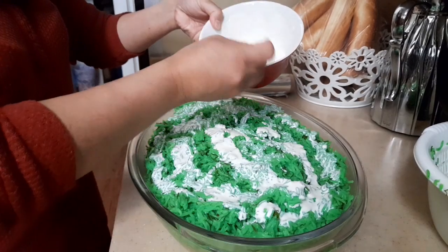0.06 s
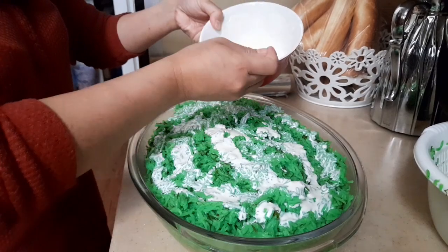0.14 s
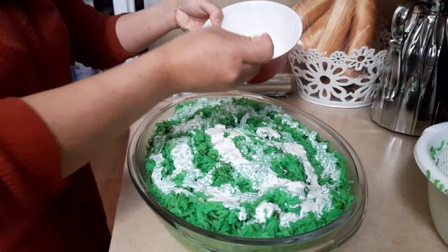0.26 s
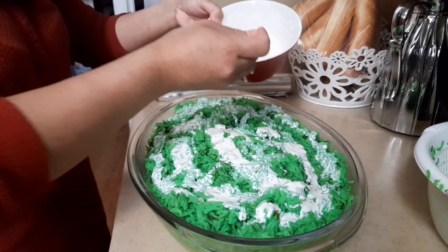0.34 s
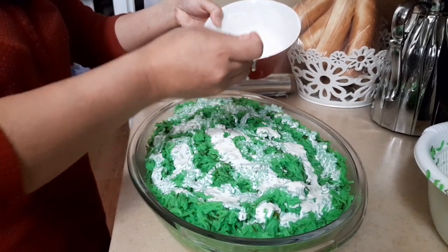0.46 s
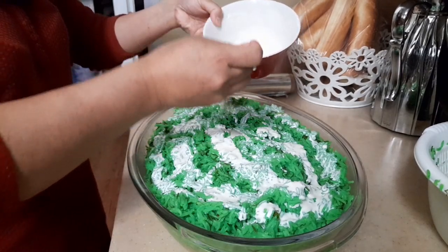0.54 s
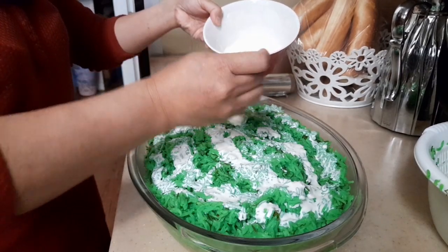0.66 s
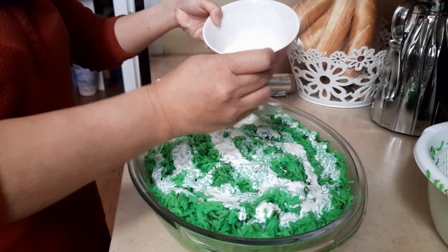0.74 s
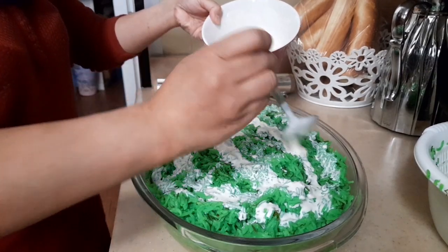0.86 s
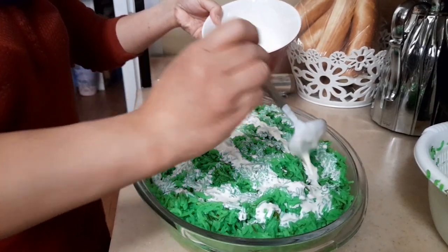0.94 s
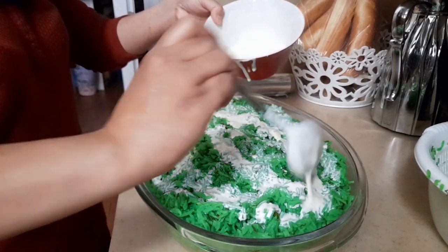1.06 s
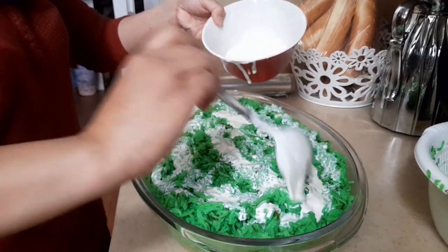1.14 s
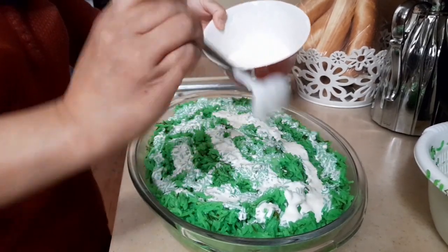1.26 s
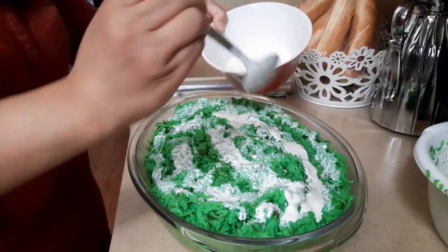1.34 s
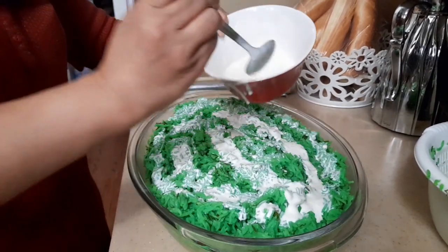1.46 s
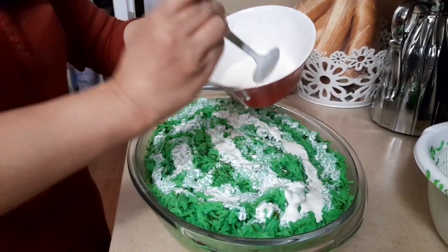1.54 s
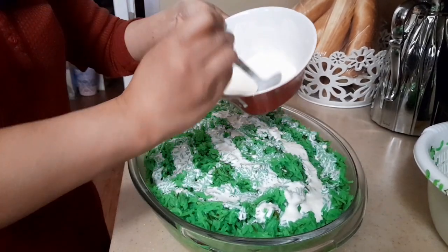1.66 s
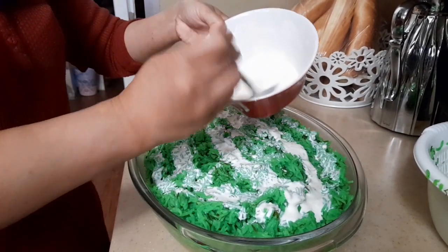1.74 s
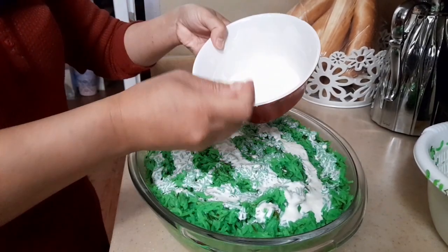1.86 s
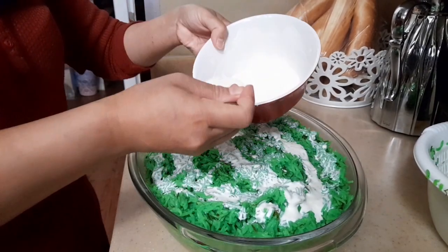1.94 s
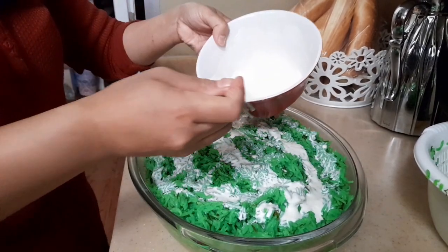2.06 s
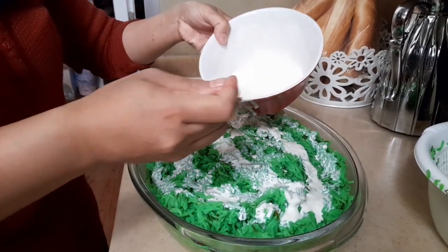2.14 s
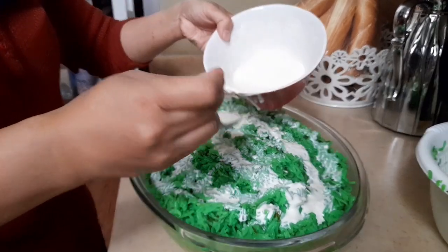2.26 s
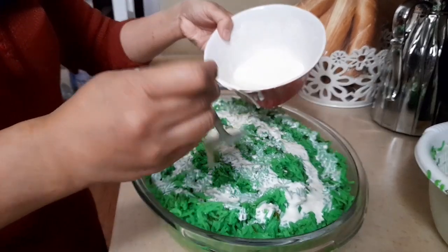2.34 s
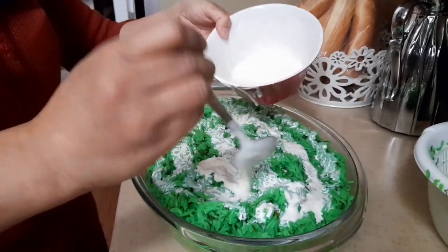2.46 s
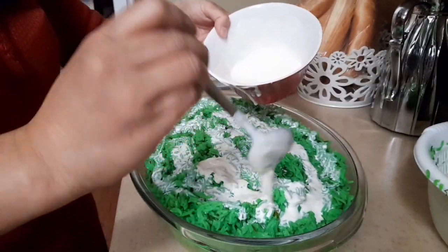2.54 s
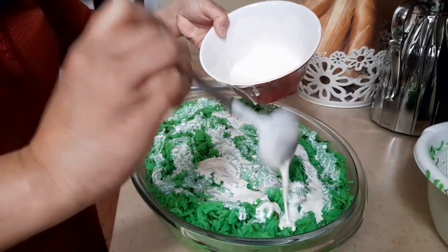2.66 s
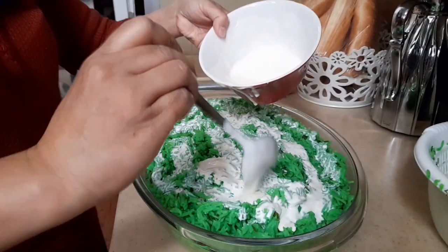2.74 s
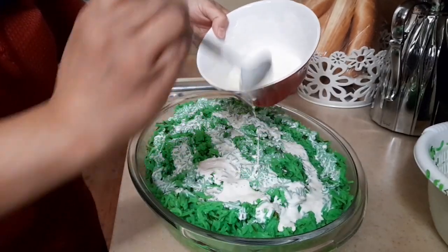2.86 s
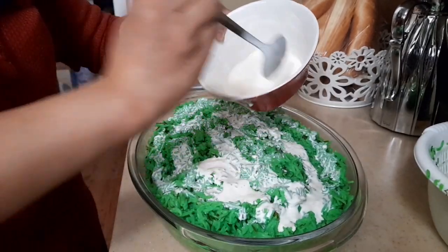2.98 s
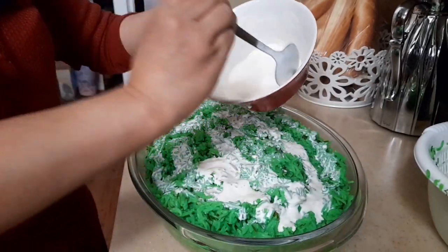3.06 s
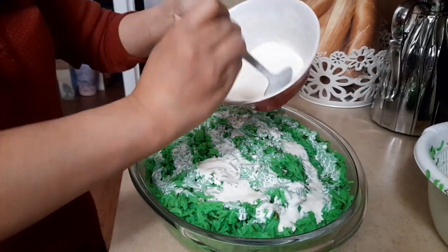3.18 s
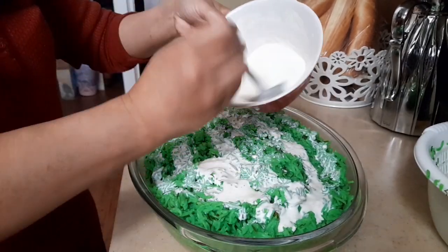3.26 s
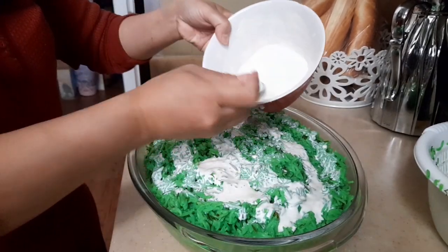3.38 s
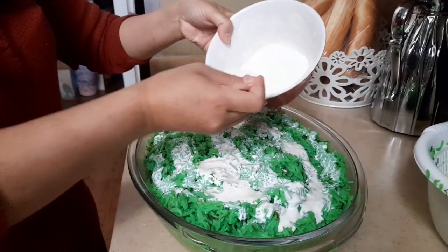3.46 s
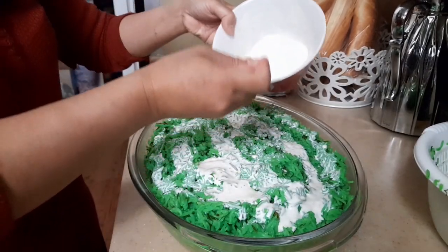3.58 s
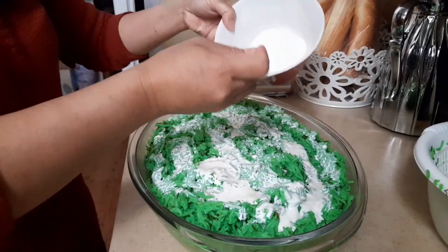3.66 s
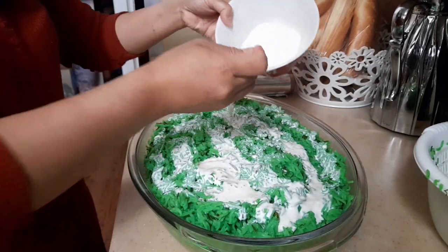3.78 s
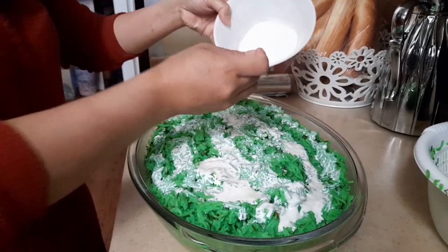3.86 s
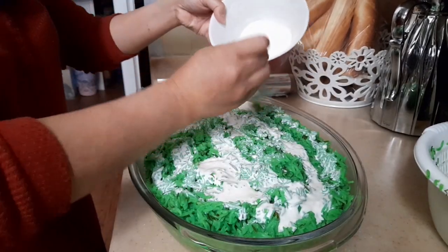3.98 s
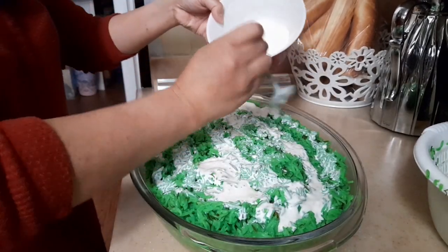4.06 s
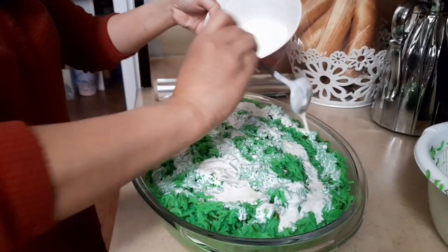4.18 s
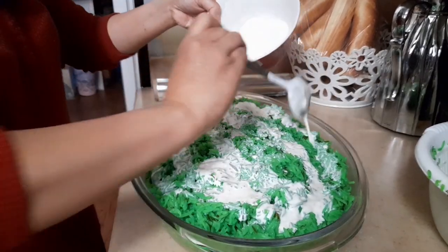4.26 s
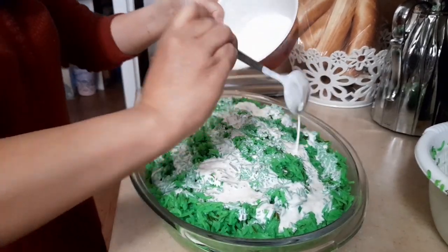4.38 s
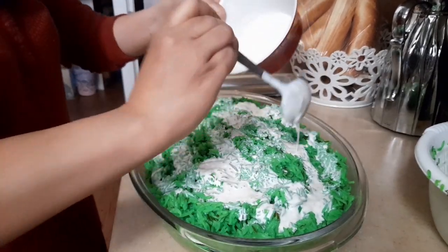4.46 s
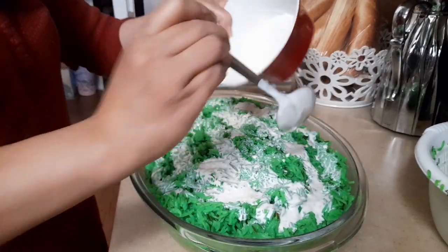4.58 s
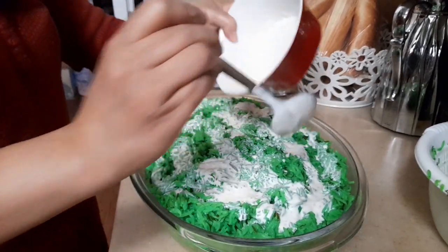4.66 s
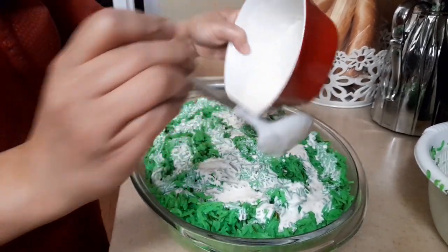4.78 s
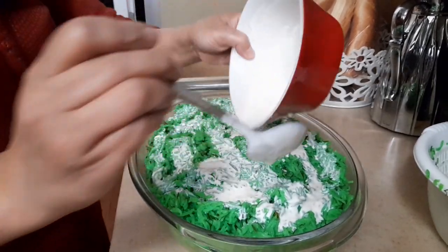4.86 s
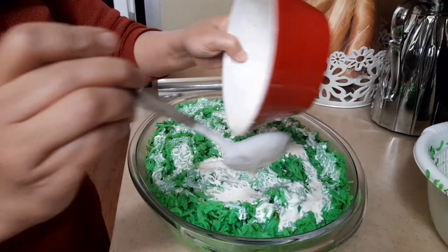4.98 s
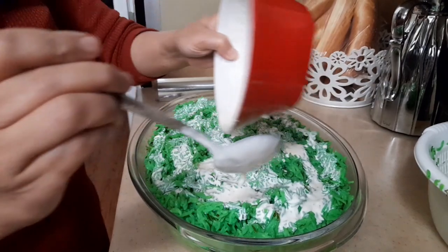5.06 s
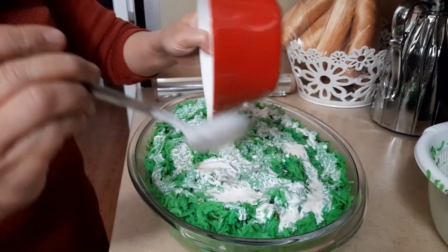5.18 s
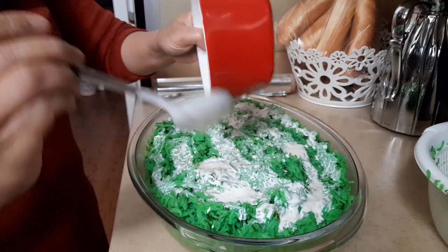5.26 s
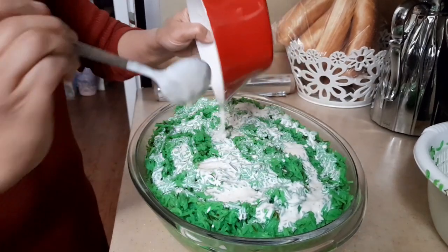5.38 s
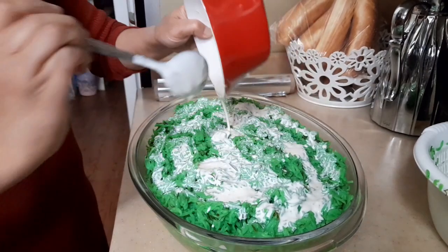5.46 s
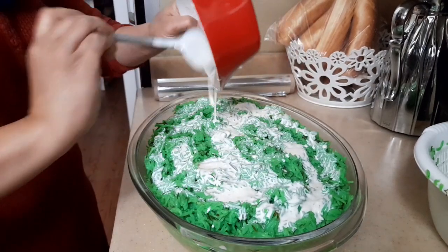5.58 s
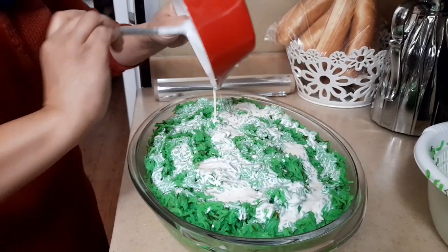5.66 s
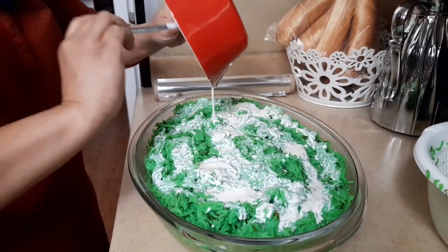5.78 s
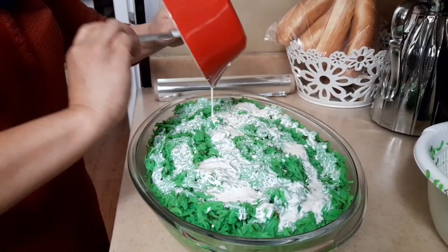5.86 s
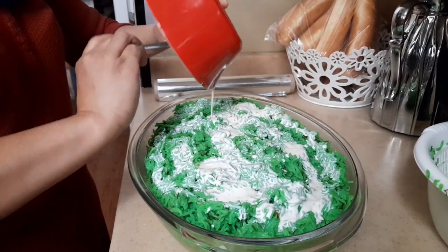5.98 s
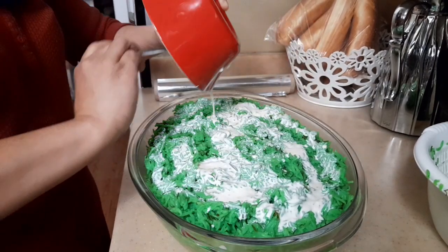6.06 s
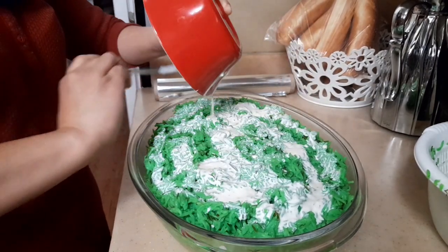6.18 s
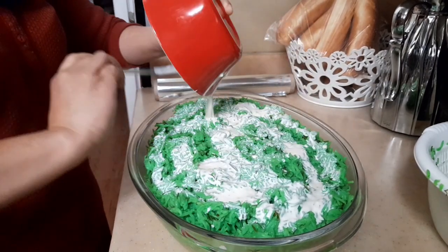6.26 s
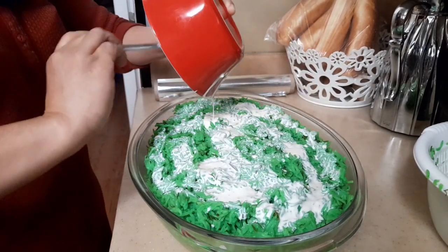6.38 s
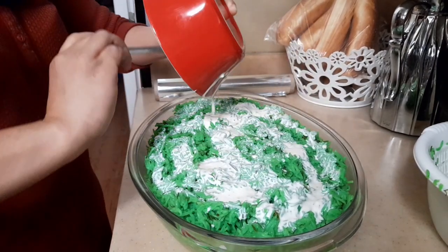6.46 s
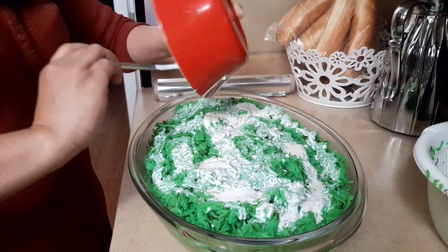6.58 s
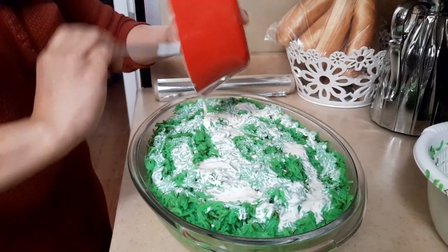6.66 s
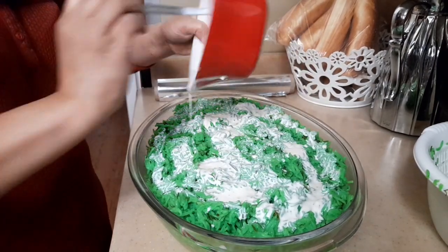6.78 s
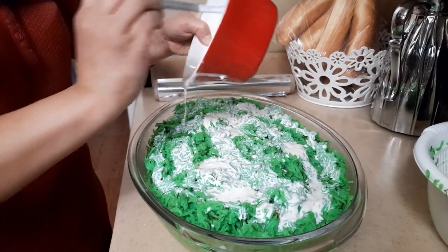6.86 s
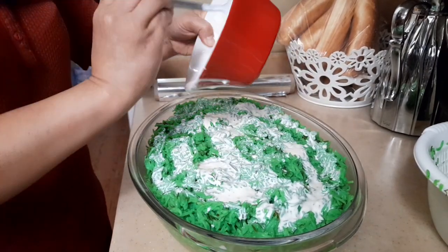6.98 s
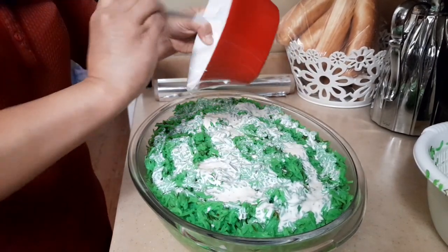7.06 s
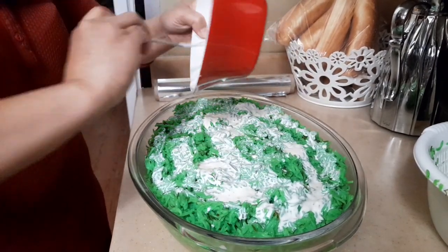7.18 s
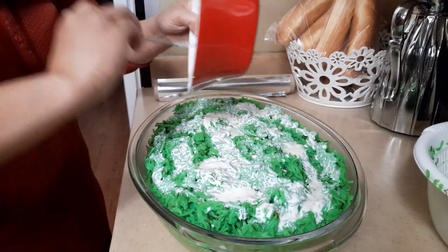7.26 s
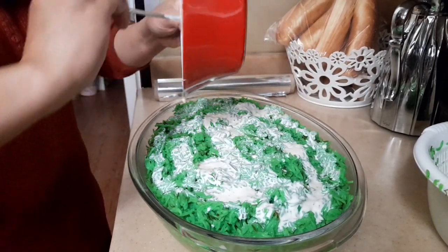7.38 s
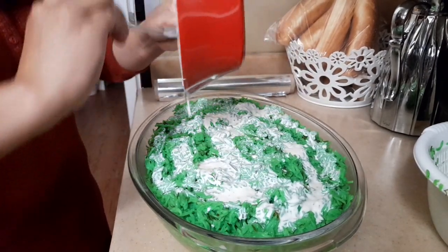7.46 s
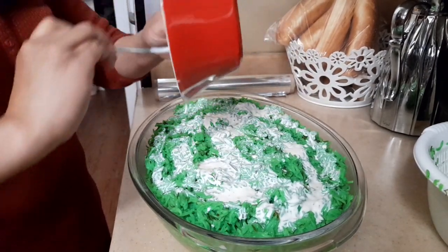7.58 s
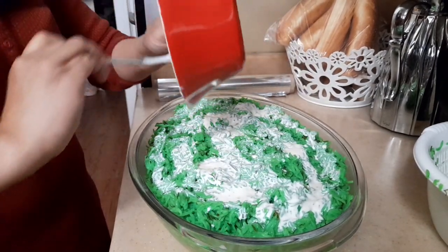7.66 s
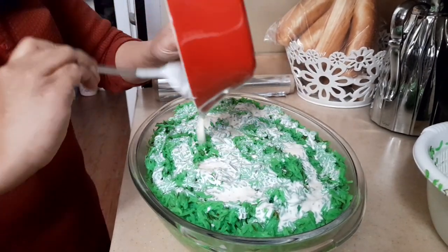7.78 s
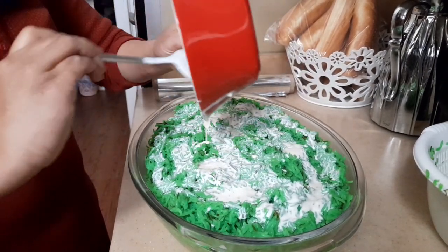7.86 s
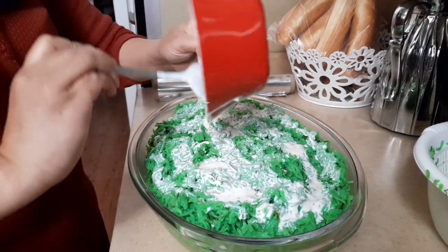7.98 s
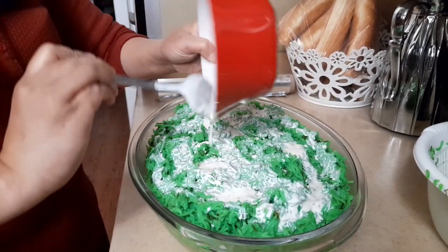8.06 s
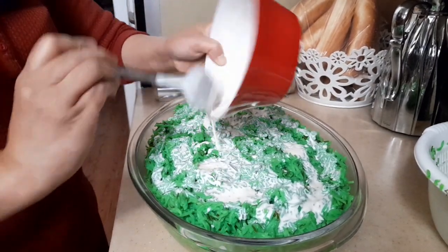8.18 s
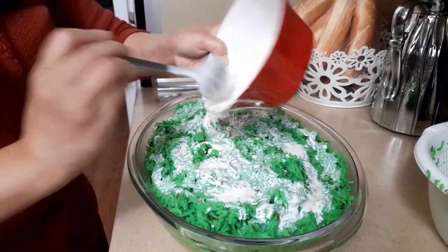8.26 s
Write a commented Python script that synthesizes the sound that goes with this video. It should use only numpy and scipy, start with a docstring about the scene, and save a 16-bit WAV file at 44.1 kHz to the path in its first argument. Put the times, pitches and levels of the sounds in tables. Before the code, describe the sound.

A close stereo view of a spoon working in a ceramic bowl in a small, hard-surfaced kitchen. The first second and a half is quiet: a fading faint scrape, a thin cream swish near 0.4 and tiny wet ticks around 1.0. A soft dull bump comes at 1.5, then a sharp clink at 1.7. At 2.1 a quick double tap merges with a short ringing scrape. Clinks at 3.1, 3.2 and 3.7 surround light drags; faint wet ticks follow near 4.1, then a lull. From 5.7 the spoon gets busy: a bright clink, gritty strokes around 6.1, taps at 6.5 to 6.9, the strongest rough scrape about 7.1, clinks at 7.4 and 7.5, a double tap at 7.7, another at 7.9 with a drag, and a bright pinging hit at 8.3. A faint uneven low motor hum and soft room rush continue throughout.

```python
"""A steel spoon clinks against a ceramic bowl of creamy topping in a small kitchen, made from decaying tones
and noise bursts. It also drags over the glaze: rubbing noise and a stick-slip tone ring the bowl and spoon.
Cream adds gliding, ragged swishes and short noise ticks, and muffled noise makes one soft, dull low bump.
Behind them, sine tones make an appliance motor's uneven low hum and shaped noise the room's quiet rush."""
import sys
import numpy as np
from scipy import signal
from scipy.fft import rfft, irfft, next_fast_len
from scipy.io import wavfile
from scipy.ndimage import map_coordinates

SR = 44100
rng = np.random.default_rng(int(sys.argv[2]) if len(sys.argv) > 2 else 0)


def unload_wav(signal):
    """Save mono or channel-first audio to the path in sys.argv[1] as 16-bit WAV at rate SR, clipped to [-1, 1]."""
    wavfile.write(
        sys.argv[1],
        SR,
        np.round(np.clip(np.atleast_2d(signal).T, -1, 1) * 32767).astype(np.int16),
    )


N = 367027
TIME = np.arange(N) / SR
RING_TIME = np.arange(SR // 4) / SR
STROKE_TIME = np.arange(int(.6 * SR)) / SR - .25  # zero is the moment of full contact

# The bowl's rim tones, damped by the hand. Each row: pitch in Hz, relative level in dB,
# time in seconds to fade by 60 dB when the spoon is not pressing.
BOWL_TONES = [(1442, -3, 0.07), (1557, 4.5, 0.079), (1677, -7.5, 0.059), (3114, 1, 0.015),
              (3183, -3.5, 0.13), (5065, 3, 0.057), (5147, -2, 0.053), (3320, -7, 0.0407)]
# The spoon's own tones. Each row: pitch in Hz, relative level in dB,
# time in seconds to fade by 60 dB when it is not pressed to the bowl.
SPOON_TONES = [(2110, -6, 0.045), (2236, -16, 0.094), (2730, -2, 0.035), (2630, -14.5, 0.026),
               (4450, -9.5, .035), (6613, 5, 0.064), (7166, 2, 0.041), (9730, -10.5, .07),
               (10440, -11, 0.037), (11510, -5, 0.11), (11800, -8, 0.079), (12500, -0.5, 0.1),
               (13470, -4, 0.056), (14450, 0.5, 0.092), (15200, -2, 0.077)]


def amp(db):
    """Turn decibels into a gain."""
    return 10 ** (np.asarray(db) / 20)


def unit(x):
    """Scale to an average (rms) level of 1."""
    return x / np.sqrt(np.mean(x ** 2) + 1e-20)


def along(points, hz):
    """Read between (Hz, value) points on a logarithmic pitch axis."""
    point_hz, values = np.transpose(points)
    return np.interp(np.log(hz + 1), np.log(point_hz + 1), values)


def curve(rows):
    """Join (seconds, value) points into one value per sample."""
    seconds, values = np.transpose(rows)
    return np.interp(TIME, seconds, values)


def wobble(rate, size=N):
    """Draw a smooth random curve through `rate` random points a second."""
    knots = rng.standard_normal(int(size * rate / SR) + 4)
    return map_coordinates(knots, [np.arange(size) * rate / SR], order=2)


def filtered(x, response):
    """Multiply each frequency of a sound by the gain that response(hz) gives."""
    size = x.shape[-1]
    padded = next_fast_len(size + 8192)
    gains = response(np.fft.rfftfreq(padded, 1 / SR))
    return irfft(rfft(x, padded) * gains, padded)[..., :size]


def coloured(x, spectrum):
    """Shape a sound with (Hz, dB) points, then scale it to rms 1."""
    return unit(filtered(x, lambda hz: amp(along(spectrum, hz))))


def panned(db):
    """Give left and right gains; positive dB makes the left louder."""
    return unit(amp([[db / 2], [-db / 2]]))


def add(track, s, sound):
    """Mix a sound into the track at s seconds, cutting what falls outside."""
    start = round(s * SR)
    part = sound[:, max(-start, 0):max(N - start, 0)]
    track[:, max(start, 0):][:, :part.shape[1]] += part


def in_kitchen(x, wet_db):
    """Add the short tail that hard walls return: noise whose pitches fade at different speeds."""
    # How long the room rings. Each row: pitch in Hz, time in seconds to fade by 60 dB.
    fade_times = [(300, 0.63), (2000, 0.33), (5000, 0.31), (15000, 0.28)]
    hz, t, noise = signal.stft(rng.standard_normal((2, SR // 2)), SR, nperseg=256)
    fade = amp(-60 * t / along(fade_times, hz)[:, None])
    tail = signal.istft(noise * fade, SR, nperseg=256)[1]
    tail *= 1 - np.exp(-np.arange(tail.shape[1]) / SR / 0.0019)  # the tail builds up within milliseconds
    response = amp(wet_db) * tail / np.linalg.norm(tail[0])
    response[:, 0] += 1  # the direct sound
    return signal.fftconvolve(x, response, axes=1)


def stereo_noise(spectrum):
    """Make noise of rms 1 that is similar left and right in the bass, nearly unrelated in the treble."""
    # How alike the two sides are. Each row: pitch in Hz, likeness from 0 to 1.
    likeness = [(60, 0.8), (250, 0.71), (600, 0.19), (2000, 0.029), (10000, 0.042)]
    # Which side is louder. Each row: pitch in Hz, left minus right in dB.
    side_lean = [(100, -5.5), (300, -0.5), (1000, 0), (10000, -2)]

    def middle_and_side_gains(hz):
        turn = np.arccos(np.clip(along(likeness, hz), -1, 1)) / 2
        return np.array([np.cos(turn), np.sin(turn)])

    noise = coloured(rng.standard_normal((2, N)), spectrum)
    mid, side = filtered(noise, middle_and_side_gains)
    left_right = np.array([mid + side, mid - side])
    return unit(filtered(left_right, lambda hz: amp(np.outer([.5, -.5], along(side_lean, hz)))))


def motor(hum_db=0, drone_db=-1):
    """An appliance motor gives an uneven low hum, a drone and a faint whine, with typed level changes."""
    # Uneven low hum near 118 Hz. Each row: time in seconds, level in dB before trim and wobble.
    hum_levels = [(0.0, -52.5), (1.46, -57.5), (1.55, -51), (2.57, -72.5), (3.26, -53), (3.61, -69),
                  (3.68, -53), (4.54, -57.5), (4.91, -49.5), (5.19, -58.5), (5.81, -51), (6.37, -79),
                  (6.56, -54), (6.65, -72.5), (7.21, -48), (7.48, -60), (8.13, -47.5), (8.32, -58.5)]
    # Low drone near 59 Hz. Each row: time in seconds, level in dB before trim and wobble.
    drone_levels = [(0.0, -52), (0.39, -63), (1.34, -61), (1.62, -51.5), (2.87, -69.5), (3.31, -57.5),
                    (4.12, -66), (4.91, -51.5), (5.91, -67), (6.46, -63), (6.81, -53.5), (7.46, -57.5),
                    (8.32, -53.5)]
    # Faint whine near 468 Hz. Each row: time in seconds, level in dB.
    whine_levels = [(1.7, -83), (2.0, -65.5), (2.55, -64.5), (2.8, -71.5), (5.2, -73.5), (6.0, -75)]

    def tone(hz, drift):
        return np.sqrt(2) * np.sin(2 * np.pi * hz * TIME + drift * wobble(4))

    hum = amp(curve(hum_levels) + hum_db + wobble(8.6)) * tone(117.7, drift=0.204)
    drone = amp(curve(drone_levels) + drone_db + wobble(4.2)) * tone(58.7, drift=0.9)
    whine = amp(curve(whine_levels)) * tone(468, drift=0.71)
    return (hum + drone) * panned(db=-7.0) + whine * panned(db=-1.5)


def rush(low_db=-57.5, hiss_db=-72.5):
    """The room's low rush is slightly wavering bassy noise, with a thin steady hiss above it."""
    low = stereo_noise([(20, -26.5), (35, -9.5), (50, -6.5), (90, 3.5), (150, -0.5), (250, -3.0),
                        (450, -5), (750, -11.5), (1500, -23.5), (3000, -40), (6000, -44)])
    hiss = stereo_noise([(1500, 0), (3000, -2.0), (5000, -5.0), (7000, -2.5), (8200, -15.5),
                         (11000, -9.5), (14000, -5.5), (16000, -9)])
    waver_db = .8 * wobble(4.7)
    return amp(low_db + waver_db) * low + amp(hiss_db) * hiss


def ring(modes, scatter_db, detune, weight=lambda hz: 0, damping=1, size=SR // 4):
    """A struck object sounds as fading tones, each shifted a little and usually ahead in phase on the left."""
    t = RING_TIME[:size]
    hz, db, t60 = np.transpose(modes)[:, :, None]
    chance = rng.standard_normal((4,) + hz.shape)
    level_db = db + weight(hz) + scatter_db * chance[0]
    side_phase = np.array([1, -1])[:, None, None] * (0.73 + 0.25 * chance[2])
    phase = 2 * np.pi * chance[1] + side_phase
    turns = hz * (1 + detune * chance[3]) * t
    fading = amp(level_db - 60 * t / (t60 * damping))
    return np.sum(fading * np.sin(2 * np.pi * turns + phase), axis=1)


def pressed(modes, colour, scatter_db, detune):
    """Spoon and bowl pressed together fade sooner; (Hz, dB) points weight their tones."""
    # damping is the share of each fade time that is left
    return ring(modes, scatter_db, detune, lambda hz: along(colour, hz), damping=0.64, size=SR // 10)


def wall(spectrum, t60):
    """A dense, quickly damped response, such as that of the bowl's wall and hollow, is fading noise."""
    t = RING_TIME[:SR // 10]
    return coloured(rng.standard_normal((2, len(t))), spectrum) * amp(-60 * t / t60)


def resonate(force, response):
    """A force sets an object sounding: convolve it with a stereo response scaled to equal energy."""
    scaled = unit(response) / np.sqrt(response.shape[1])
    return signal.oaconvolve(force[None], scaled, axes=1)[:, :len(force)]


def grit(rate, grain_db):
    """Friction is many tiny slips of uneven size, mixed with an equally strong smooth rub."""
    size = len(STROKE_TIME)
    slips = (rng.random(size) < rate / SR) * amp(grain_db * rng.standard_normal(size))
    return unit(unit(slips * rng.standard_normal(size)) + rng.standard_normal(size))


def chatter(slip_hz, spread, flutter_db, octave=0):
    """Sticking and slipping makes a tone ragged in pitch and level; abrupt slips add its octave."""
    ragged_hz = slip_hz * np.exp(spread * wobble(1200, size=len(slip_hz)))
    phase = 2 * np.pi * np.cumsum(ragged_hz) / SR
    wave = np.sin(phase) + octave * np.sin(2 * phase)
    return unit(wave * amp(flutter_db * wobble(350, size=len(slip_hz))))


def stroke(lead_in, hold, firm_db, sing_db, hiss_db, slip_hz, glide, chatter_db=-6, body_db=-8,
           ring_db=-2, glaze_db=-2, steel_db=0, pressure_db=1.5):
    """One drag leans in, holds and lifts off; its friction drives bowl, spoon and glaze."""
    # Steel sliding on wet glaze. Each row: pitch in Hz, relative strength in dB per Hz.
    glaze_colour = [(300, -16), (1000, 3.5), (2500, -21), (4300, 4), (5900, 3), (7200, 6.5), (8100, -20),
                    (9500, 6), (12500, -5.5), (15500, -9)]
    t = STROKE_TIME
    contact_db = -16.5 * (np.maximum(-t, 0) / lead_in) ** 1.05  # the rise while leaning in
    contact_db -= 398.5 * np.maximum(t - hold, 0)  # the fall per second while lifting off
    contact_db += pressure_db * wobble(130.5, size=len(t))  # the hand presses unevenly
    progress = np.clip(t / hold, 0, 1) - .5
    # over one hold the chatter eases by 2 dB and the hiss by 0.5 dB
    firm = amp(firm_db + contact_db - 2 * progress)
    hiss = amp(hiss_db + contact_db - 0.5 * progress)
    rub = grit(rate=1100, grain_db=3.5)

    # firmer contact makes the stick-slip stronger and more ragged
    grip = np.clip((firm_db + contact_db + 59.5) / 18, .1, 1)
    glide_time = np.clip(t, -lead_in, hold + lead_in) - hold / 2
    gliding_hz = slip_hz * 2 ** (glide * glide_time)
    judder = grip * chatter(gliding_hz, spread=.095 * grip, flutter_db=1.5, octave=0.39) + 0.248 * rub

    # each stroke meets the bowl at a new place, so the tones take new weights
    low_modes = pressed([m for m in BOWL_TONES + SPOON_TONES if m[0] < 4000],
                        [(1600, -2.5), (2150, 9.5), (3200, -9)], scatter_db=1.5, detune=0.006)
    high_modes = pressed([m for m in BOWL_TONES if m[0] > 2000],
                         [(3200, -0.32), (5100, -0.89)], scatter_db=1.5, detune=0.0044)
    steel_modes = pressed(SPOON_TONES, [(4500, 1), (6600, 2.5), (7100, 0.0), (9600, 5), (12500, -0.5),
                                        (15000, -5)], scatter_db=3.0, detune=0.0028)
    hollow = wall([(700, -4.0), (1200, -33), (1550, -1.0), (2150, 4.5), (2700, 7.0), (3300, 7.5),
                   (3900, -5.0), (4800, -0.5), (7000, -13.5), (8200, -58.0)], t60=0.014)
    return (resonate(judder * firm * amp(chatter_db), hollow)
            + resonate(rub * firm * amp(body_db), low_modes)
            + resonate(rub * amp(sing_db + contact_db + ring_db), high_modes)
            + resonate(rub * hiss * amp(glaze_db), wall(glaze_colour, t60=0.0315))
            + resonate(rub * hiss * amp(steel_db), steel_modes))


def scrapes():
    """The spoon drags over the glaze, stroke after stroke."""
    # Each row: full contact in seconds, lead-in in seconds, hold in seconds, then levels in dB before
    # trims of chatter, bowl ring and glaze hiss, stick-slip rate in Hz at mid-hold,
    # its glide in octaves per second.
    strokes = [(.005,0.077,0.064,-61,-67,-69.5,1690,-2.5), (2.108,0.074,.028,-41,-44.5,-56.5,1716,-1),
               (2.158,0.029,0.018,-46,-39.5,-50.5,1600,-0.5), (3.109,.03,.1,-59.5,-62.5,-67,2300,2),
               (3.256,0.035,0.083,-58,-56,-53,2290,2), (3.387,.054,.078,-73,-66.5,-72.5,2305,0),
               (5.834,0.057,.11,-56,-67,-64.5,2080,1.5), (6.082,0.026,0.038,-43,-55,-62,1705,0.5),
               (6.144,.047,0.044,-47,-55,-53.5,1706,-1), (6.488,0.029,0.094,-50,-54,-55,2690,2),
               (6.915,.04,.16,-49.5,-59,-51.5,2120,-0.2), (7.085,0.035,0.028,-40.5,-48,-47,2070,2.5),
               (7.129,.04,0.031,-32,-32,-43.5,2450,4), (7.198,.03,0.049,-48,-60,-61.5,2700,2),
               (7.531,.04,0.089,-48.5,-56,-71,2750,1.5), (7.624,.02,.06,-44.5,-49,-61.5,2970,-1.2),
               (7.703,0.034,0.02,-38.5,-42,-51.5,1723,-2.5), (7.992,.048,0.13,-51,-54.5,-53.5,2170,0.5)]
    out = np.zeros((2, N))
    for s, *shape in strokes:
        add(out, s + STROKE_TIME[0], stroke(*shape))
    return in_kitchen(out * panned(db=-2.5), wet_db=-12.5)[:, :N]


def swishes(spread=0.1, flutter_db=4):
    """Cream slides over the spoon with a thin, ragged swish that sinks in pitch."""
    # Each row: middle in seconds, length in seconds, level in dB before flutter and room.
    slides = [(0.405, 0.23, -72), (2.858, .22, -76), (7.438, 0.035, -63)]
    middle_hz, sag_octaves = 4840, .35  # the sag is the fall from start to end
    gain, pitch_hz = np.zeros(N), np.full(N, float(middle_hz))
    for s, length, db in slides:
        place = (TIME - s) / length
        inside = np.abs(place) < .5
        gain[inside] = amp(db) * np.cos(np.pi * place[inside]) ** 2
        pitch_hz[inside] *= 2 ** (-sag_octaves * place[inside])
    swish = gain * chatter(pitch_hz, spread, flutter_db)
    return in_kitchen(swish * panned(db=-4.0), wet_db=2.0)[:, :N]


def topping(tick_db=-5, t60=0.028):
    """Small films of cream part with a wet tick: a short noise burst around one pitch."""
    # Each row: start in seconds, level in dB before the tick trim, centre pitch in Hz.
    ticks = [(0.9153, -54, 5440), (1.04, -48.5, 9100), (4.009, -55, 4780), (4.163, -57.5, 6970)]
    out = np.zeros((2, N))
    for s, db, hz in ticks:
        noise = rng.standard_normal((2, len(RING_TIME)))
        burst = coloured(noise, [(hz / 3, -20), (hz, 0), (hz * 2, -14)])
        fading = amp(db + tick_db - 60 * RING_TIME / t60)
        add(out, s, in_kitchen(burst * fading, wet_db=-6))
    return out


def bump():
    """A soft, dull low bump, perhaps the bowl touching something, made from muffled, fading noise."""
    # One row: time of full strength in seconds, level in dB.
    bump_row = (1.546, -41.5)
    s, db = bump_row
    attack_s, t60 = 0.012, 0.51
    age = TIME - s
    envelope = np.clip(1 + age / attack_s, 0, 1) * amp(db - 60 * np.maximum(age, 0) / t60)
    return envelope * stereo_noise([(50, -14), (140, 10.5), (220, -5.5), (400, 2.5), (650, -6.5),
                                    (1100, -18), (4000, -31.5), (10000, -45.0)])


def clinks(bowl_db=3, spoon_db=-3, clack_db=3, clack_t60=0.089, snap=0.73, snap_t60=0.036,
           rise=0.00084, rattle_t60=0.081):
    """Spoon hits bowl: the place of contact sets how much the bowl, the spoon and a noisy clack sound."""
    # Each row: start in seconds, overall level in dB, then relative levels in dB before trims of the knock,
    # the first, second and third rim tones, the steel, the rattle and the ping;
    # ping pitch in Hz, left minus right in dB.
    blows = [(1.6681,-20,-17.5,-29.5,-15.5,-18,-15.5,-24,-9.5,6400,-1.5),
             (2.1059,-26,-20,-14,-8.5,-16,-44,-27,-20,7100,0),
             (2.1198,-30.5,-16,-10,-2.5,0,-41.5,-22,-15,7100,-2.5),
             (3.0694,-23,-39,-31,-13.5,-16,-29,-10.5,-16,6400,-2),
             (3.1875,-16,-20,-26.5,-25,-20,-16.5,-10.5,-10,6860,-2.5),
             (3.6619,-16,-29.5,-21.5,-11,-5.5,-23.5,-19.5,-19.5,6600,-2),
             (5.746,-22.5,-18.5,-17,-24,-20,-13.5,-12,-11.5,6800,-2),
             (6.4616,-24,-17.5,-32,-9.5,-14,-10,-35,-8.5,7030,-1.5),
             (6.7493,-30.5,-30,-17,-18,-16.5,-19.5,-29,-20,6600,-2.5),
             (6.8585,-22.5,-19,-29,-19.5,-14.5,-18.5,-12,-6.5,6600,-0.5),
             (7.099,-29,-32,-15,-16,-28,-30,-26,-20,6600,-3),
             (7.3539,-19.5,-25.5,-49,-43,-21.5,-23.5,-18.5,-13.5,7050,-2),
             (7.4755,-21,-22,-14.5,-1,-8.5,-11.5,-26,-24,7100,-3),
             (7.6983,-32,-19,-7.5,4,-5.5,-26,-22,-10,7150,1.5),
             (7.7043,-31,-21,-10.5,1.5,-7.5,-26,-17,-11,7150,-3),
             (7.9477,-19.5,-21,-28.5,-14,-7,-16.5,-22,-10,7100,-2.5),
             (8.303,-14.5,-22,-25.5,-19,-8,-15,-28,-1.5,7190,-3.5)]
    # The dense, short clack of a contact. Each row: pitch in Hz, relative strength in dB per Hz.
    clack_colour = [(150, -10), (500, -9.5), (850, -2.5), (1500, -6.5), (2400, -2), (4500, 2), (5800, -1),
                    (7250, 1.5), (8100, -14), (9300, -0.5), (12000, 3), (15500, -5.5)]
    # The spoon's edge rattling on the glaze. Each row: pitch in Hz, relative strength in dB per Hz.
    rattle_colour = [(1000,-26), (2500,-4), (3800,-12), (4700,2), (5700,-3), (7200,3), (8100,-22.5),
                     (9500,-16), (15500,-15.5)]
    t, size = RING_TIME, len(RING_TIME)
    out = np.zeros((2, N))
    for (s, db, knock_db, first_db, second_db, third_db, steel_db, rattle_db,
         ping_db, ping_hz, pan_db) in blows:
        rim = [(1600, first_db), (3150, second_db), (5100, third_db)]
        bowl = ring(BOWL_TONES, scatter_db=3.0, detune=0.0026, weight=lambda hz: along(rim, hz))
        bowl *= panned(db=-1.0)
        # a contact cushioned by cream loses its highest tones first
        treble = [(10000, steel_db), (15000, steel_db + 0.48 * min(steel_db + 11.0, 0))]
        spoon = ring(SPOON_TONES, scatter_db=5.5, detune=0.00516, weight=lambda hz: along(treble, hz))

        rim_mean_db = (first_db + second_db + third_db) / 3
        hardness = [(1000, knock_db + 10.0), (3500, rim_mean_db + 2.0)] + treble
        noise = coloured(rng.standard_normal((2, size)), clack_colour)
        clack = filtered(noise, lambda hz: amp(along(hardness, hz)))
        clack *= amp(-60 * t / clack_t60) + snap * amp(-60 * t / snap_t60)
        blow = amp(bowl_db) * bowl + amp(spoon_db) * spoon + amp(clack_db) * clack

        # the spoon's bright ping; its pitch depends on where the spoon lands
        blow += ring([(ping_hz, ping_db, .07)], scatter_db=2.0, detune=0.00082)
        recontacts = unit(amp(4.9 * wobble(450, size=size))) * amp(rattle_db - 60 * t / rattle_t60)
        blow += recontacts * coloured(rng.standard_normal((2, size)), rattle_colour)
        blow *= amp(db) * (1 - np.exp(-t / rise))
        add(out, s, in_kitchen(blow * panned(pan_db), wet_db=-7.5))
    return out


def scene():
    """Spoon, bowl and cream sound in front of the kitchen's background."""
    return motor() + rush() + scrapes() + swishes() + topping() + bump() + clinks()


def record(dry):
    """The recorder's band limit cuts very steeply above 16100 Hz."""
    return filtered(dry, lambda hz: 1 / (1 + (hz / 16100) ** 120))


dry = scene()
out = record(dry)
unload_wav(out)
```